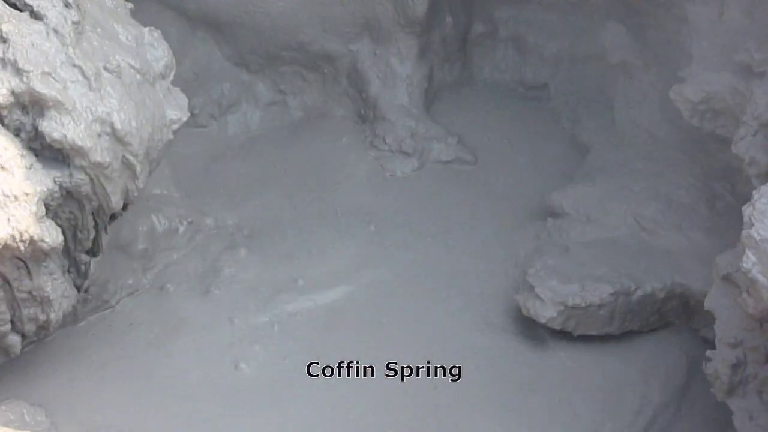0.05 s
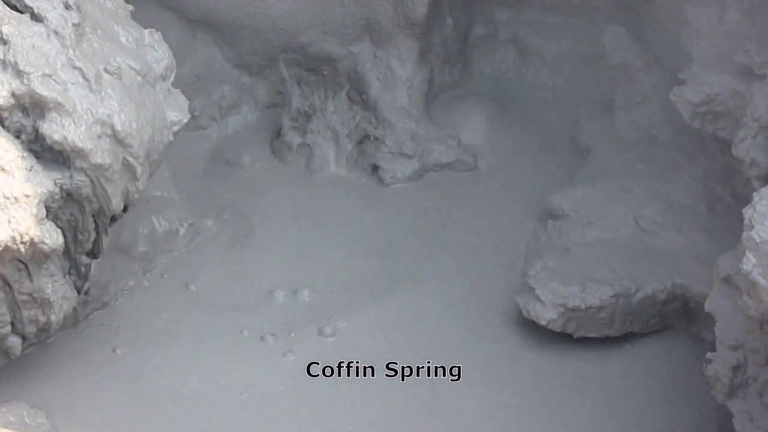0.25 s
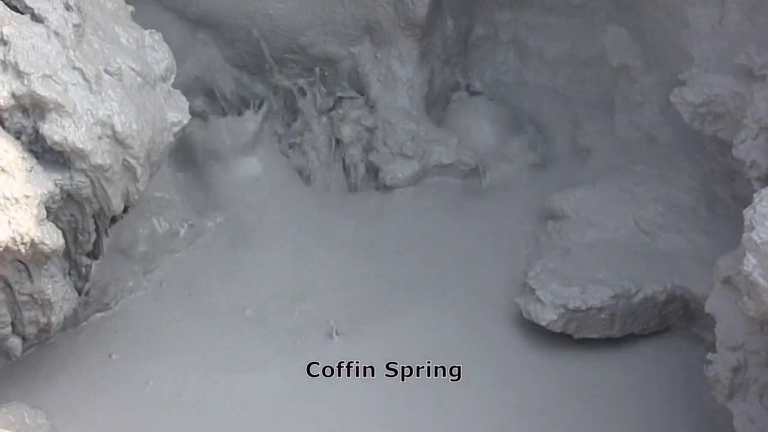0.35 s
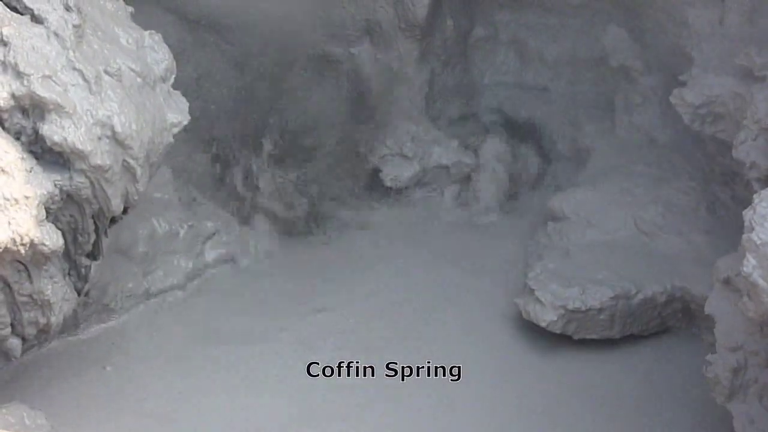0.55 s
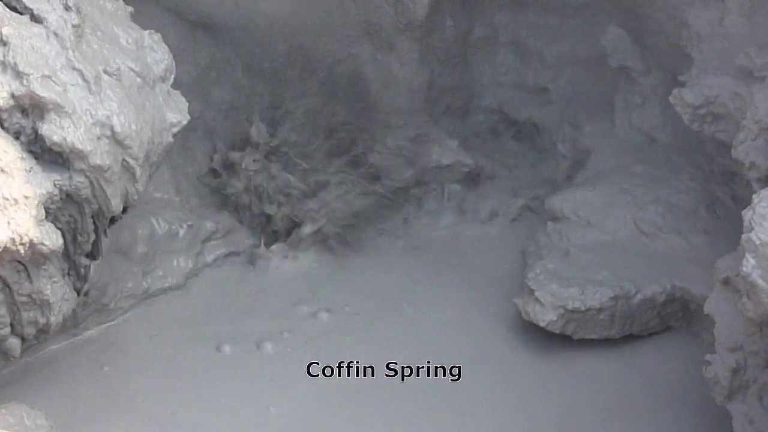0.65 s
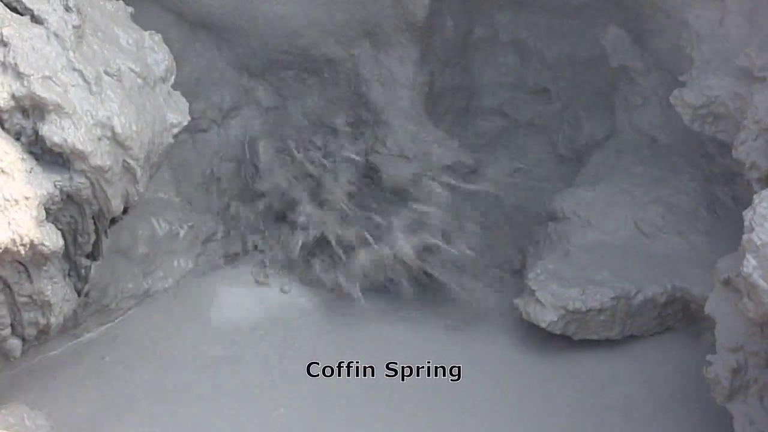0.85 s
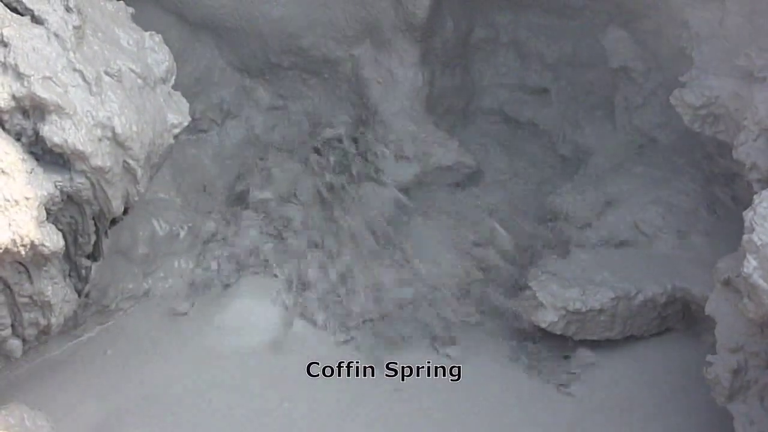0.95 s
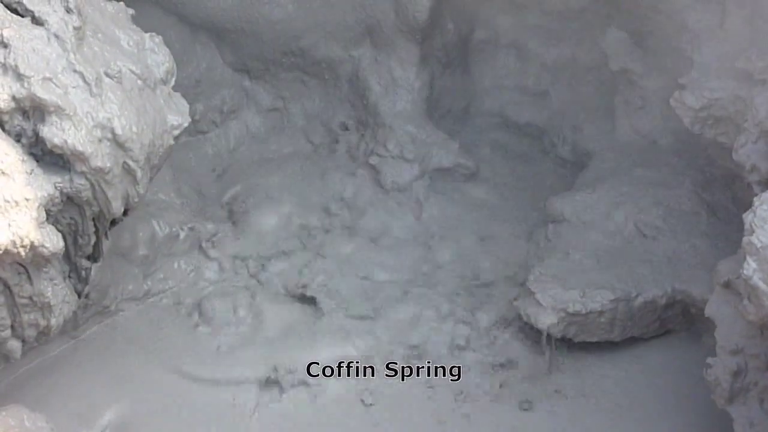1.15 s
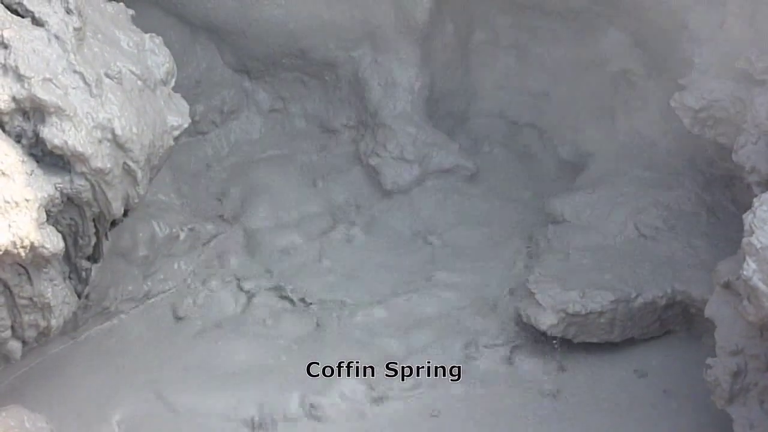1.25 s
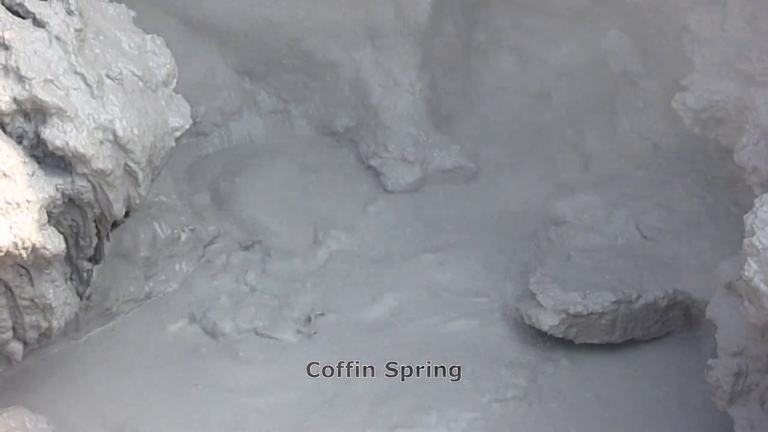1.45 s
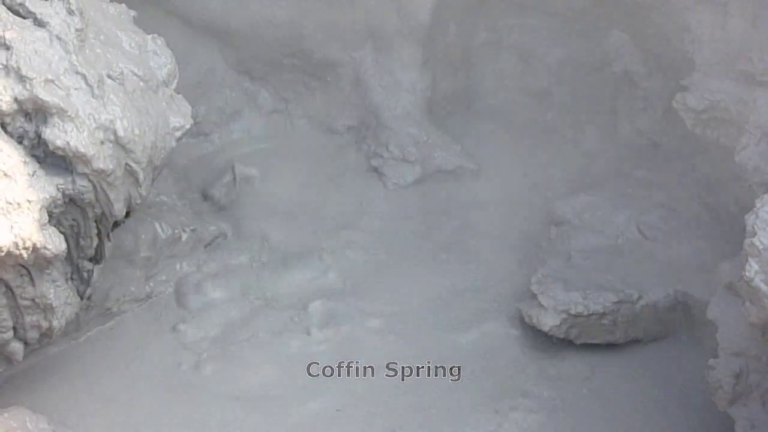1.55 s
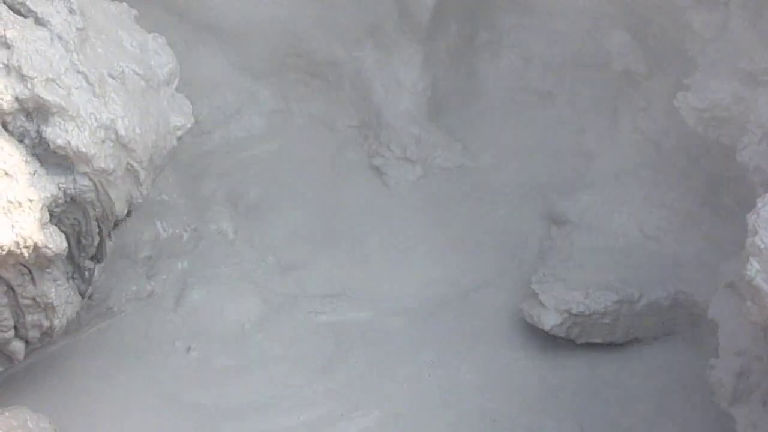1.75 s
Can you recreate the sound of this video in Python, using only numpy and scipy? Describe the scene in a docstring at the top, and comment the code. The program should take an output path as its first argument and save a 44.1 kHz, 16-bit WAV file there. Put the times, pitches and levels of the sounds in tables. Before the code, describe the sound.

A muddy hot spring surges once in a rocky hollow outdoors. Low gulps of gas throw up a splash, spray patters back and the pool sloshes, then settles with single bubble pops over a faint steam hiss.

```python
"""A muddy hot spring surges once in a hollow of rock, outdoors.
It starts on a faint simmer and hiss of steam, which last throughout. From 0.2 s pockets of gas
gulp up and heave the mud; near 0.6 s they throw the water. The spray rains back and the pool
sloshes until about 1.2 s. Single bubbles pop during the surge and on to the end as it settles."""
import sys
import numpy as np
from scipy import signal
from scipy.io import wavfile

SR = 44100
rng = np.random.default_rng(int(sys.argv[2]) if len(sys.argv) > 2 else 0)


def materialize(psi):
    """Save the field psi as 16-bit PCM at rate SR to the path in sys.argv[1].

    A 1-D psi becomes a single channel; in a 2-D psi each row is a channel.
    """
    bounded = np.clip(np.atleast_2d(psi).T, -1, 1)
    quanta = np.round(bounded * 32767).astype(np.int16)
    wavfile.write(sys.argv[1], SR, quanta)


N = 79380
TIME_S = np.arange(N) / SR

# layer envelopes: (time [s], level [dB])
SURGE_LEVEL = [(0, -78), (.22, -59), (.27, -47.5), (.335, -42), (.355, -46), (.385, -38), (.41, -53.5),
               (.46, -43.5), (.515, -27), (.56, -37.5), (.58, -24.5), (.62, -38), (.655, -26.5),
               (.685, -30.5), (.70, -27), (.74, -38.5), (.85, -37), (1.8, -75.5)]
SPRAY_LEVEL = [(0, -61), (.24, -56), (.262, -45), (.30, -59), (.385, -48), (.462, -42.5), (.474, -38),
               (.53, -29.5), (.66, -35.5), (.80, -39.5), (.91, -36.5), (1.06, -30), (1.13, -31.5),
               (1.21, -39), (1.28, -45.5), (1.385, -50.5), (1.44, -40.5), (1.50, -55), (1.8, -57)]
SLOSH_LEVEL = [(0, -75), (.07, -68), (.1, -51.5), (.15, -79.5), (.19, -49.5), (.22, -62), (.32, -46.5),
               (.364, -45.5), (.378, -37.5), (.42, -38.5), (.58, -29.5), (.77, -41), (.88, -40.5),
               (1.0, -43), (1.12, -37.5), (1.21, -51.5), (1.42, -44), (1.52, -59), (1.8, -56)]
HEAVE_LEVEL = [(0, -57), (.07, -63.5), (.15, -55), (.18, -50), (.25, -43), (.29, -48), (.355, -47),
               (.375, -39.5), (.47, -36.5), (.54, -33), (.58, -26.5), (.61, -29), (.66, -33), (.69, -37.5),
               (.76, -44), (.80, -56), (1.15, -56.5), (1.3, -68.5), (1.8, -66.5)]
# layer spectra: (frequency [Hz], relative density [dB])
SURGE_SPECTRUM = [(60, -26.5), (150, -18), (240, 0), (320, -7.5), (420, 0), (540, -5.5), (800, -1.5),
                  (1120, -6), (1350, -3.5), (1700, -7), (3000, -10.5), (4500, -15), (6300, -18),
                  (7400, -26)]
SPRAY_SPECTRUM = [(60, -28), (120, -14.5), (280, -13.5), (500, -8), (900, 1), (1150, -2), (1350, 1.5),
                  (2000, -1), (2800, 3), (4000, -3.5), (5200, -5), (6400, -6.5), (7400, 1)]
SLOSH_SPECTRUM = [(50, -22), (110, -20), (200, -8), (290, -10), (400, 1.5), (560, -1.5), (740, -9),
                  (1000, -14.5), (1600, -21), (7000, -48.5)]
HEAVE_SPECTRUM = [(30, -12), (48, -11.5), (70, 0), (100, 2), (135, -2), (175, -4.5), (240, -14), (400, -22),
                  (1000, -50), (7000, -79)]
SIMMER_SPECTRUM = [(25, -16.5), (50, -9), (90, -9.5), (170, 8), (300, -1), (700, -5.5), (1100, -8.5),
                   (1700, -15), (2700, 1), (4500, -23), (7000, -10)]
STEAM_SPECTRUM = [(30, -7.5), (200, 9), (1000, 8), (3000, -10.5), (5000, -3), (6400, -4), (7400, -22.5)]
# gas pockets: (peak time [s], pitch [Hz], glide [oct/s], peak [dB], swell tau [s], decay tau [s])
GAS_POCKETS = [(0.24, 64.4, 15, -32.5, 0.036, 0.018), (.397, 42.7, -4, -28.5, 0.011, 0.034),
               (.376, 133, -0.5, -29, .004, 0.014), (.398, 258.3, -1.5, -31.5, 0.0092, 0.044),
               (0.537, 98, -5, -21, 0.014, 0.013), (0.571, 85.6, -11.5, -20, .006, 0.02),
               (.644, 229.6, 1, -16.5, 0.013, 0.0081), (0.657, 112.3, -11, -15, .008, 0.0076),
               (0.747, 69.5, 19.5, -34, .03, 0.044), (1.154, 117, -8.5, -36.5, 0.0043, 0.018)]
# bursting bubbles: (time [s], pitch [Hz], ring [dB], ring T60 [s], splat [dB], attack tau [s])
BUBBLE_BURSTS = [(0.032, 6470, -34, 0.0061, -42.5, 0.00024), (0.236, 1030, -26, 0.044, -31, 0.00039),
                 (0.2358, 2550, -34, 0.021, -45, 0.00037), (.254, 5010, -38.5, 0.028, -43, 0.0015),
                 (.314, 575, -31.5, 0.14, -45.5, 0.0021), (0.325, 1535, -30.5, 0.047, -29, 0.0025),
                 (0.33, 2545, -33, 0.033, -33.5, 0.00206), (.469, 5700, -36, .015, -30, 0.00039),
                 (.513, 1080, -38, 0.016, -30.5, 0.0015), (.574, 390, -26, 0.024, -26, 0.0019),
                 (.575, 1086, -20.5, 0.034, -20, 0.0023), (0.602, 1140, -17, 0.028, -29.5, .001),
                 (.695, 753, -34, 0.053, -28, 0.0012), (1.106, 547, -26, 0.036, -31, 0.0011),
                 (1.15, 2050, -17, 0.016, -26, 0.00054), (1.152, 2537, -22, 0.026, -25, 0.00053),
                 (1.285, 437, -26.5, 0.034, -37.5, 0.00054), (1.298, 405, -26.5, 0.032, -46, 0.0012),
                 (1.3306, 2854, -28, 0.036, -32, 0.00072), (1.393, 1387, -32, 0.044, -33, 0.0035),
                 (1.406, 1080, -32, 0.015, -34, 0.0016), (1.439, 2207, -30.5, 0.03, -29.5, 0.0023),
                 (1.57, 2220, -38.5, 0.023, -38, 0.00077), (1.598, 1190, -35.5, 0.017, -48, 0.00085),
                 (1.626, 3000, -45, 0.012, -45.5, .001), (1.682, 2320, -41.5, 0.0098, -43, 0.00061),
                 (1.742, 714, -38, 0.052, -41.5, 0.0016), (1.754, 3150, -35.5, 0.027, -40, 0.0024)]
# rock wall echoes: (delay [s], gain [dB])
WALL_ECHOES = [(.0031, -21), (.0074, -4.5), (.0135, -15)]
# peaks and dips of the hollow: (frequency [Hz], width [Hz], gain [dB])
HOLLOW_RESONANCES = [(349, 8.5, 1.5), (438, 11, 3), (539, 59, -6), (595, 24, 1), (752, 21, 3.5),
                     (1138, 43, 6.5), (1390, 330, -7), (1429, 60, 8)]


def surge():
    """Gas tears the surface open and throws up a sheet of muddy water."""
    sheet = water(SURGE_SPECTRUM, drops_per_s=900, bubbles_per_s=140, spread_db=3.5,
                  t60_cycles=24, bubble_db=4.5, wash_db=-1, flicker_db=2.1)
    return envelope(SURGE_LEVEL) * sheet


def gulps(roughness=0.17):
    """Big gas pockets throb unevenly, swell and glide as they near the surface, then die away."""
    out = np.zeros(N)
    for peak_s, hz, glide_oct_per_s, peak_db, swell_s, decay_s in GAS_POCKETS:
        t = TIME_S - peak_s
        pitch_hz = hz * 2 ** np.clip(glide_oct_per_s * t, -.75, .75)
        cycles = np.cumsum(pitch_hz) / SR
        cycles -= np.interp(peak_s, TIME_S, cycles)  # zero phase at the peak
        swell = np.exp(-np.abs(t) / np.where(t < 0, swell_s, decay_s))
        throb = 1 + roughness * drift(hz / 2)
        out -= from_db(peak_db) * swell * throb * np.cos(2 * np.pi * cycles)
    return out


def pops(rise_oct_per_s=1.8, wobble_rad=0.71, splat_t60_s=0.029, splat_width_oct=0.96):
    """Each bubble bursts with a wet splat and a short, rising ring that wobbles in the mud."""
    out = np.zeros(N)
    edge_ratio = 2 ** (splat_width_oct / 2)
    for start_s, hz, ring_db, ring_t60_s, splat_db, attack_s in BUBBLE_BURSTS:
        t = np.maximum(TIME_S - start_s, 0)
        pitch_hz = hz * 2 ** np.minimum(rise_oct_per_s * t, 1)
        cycles = np.cumsum(pitch_hz * (t > 0)) / SR
        phase_rad = 2 * np.pi * cycles + wobble_rad * drift(hz / 10)
        tone = from_db(ring_db - 60 * t / ring_t60_s) * np.sin(phase_rad)
        noise = unit_rms(band(rng.standard_normal(N), hz / edge_ratio, hz * edge_ratio))
        splat = from_db(splat_db - 60 * t / splat_t60_s) * noise
        out += (tone + splat) * (1 - np.exp(-t / attack_s))
    return out


def spray():
    """Drops patter on the pool and the rock."""
    patter = water(SPRAY_SPECTRUM, drops_per_s=1300, bubbles_per_s=180, spread_db=2.5,
                   t60_cycles=27, bubble_db=0, wash_db=-2, flicker_db=1.3)
    return envelope(SPRAY_LEVEL) * patter


def slosh():
    """The stirred pool gurgles with mid-sized bubbles."""
    gurgle = water(SLOSH_SPECTRUM, drops_per_s=300, bubbles_per_s=40, spread_db=3.5,
                   t60_cycles=22.2, bubble_db=0.5, wash_db=-8.5, flicker_db=3.5)
    return envelope(SLOSH_LEVEL) * gurgle


def heave():
    """Thick mud rumbles as gas pushes through it."""
    rumble = coloured(lambda hz: clicks(per_s=400, spread_db=3.1), HEAVE_SPECTRUM, flicker_db=-0.5)
    return envelope(HEAVE_LEVEL) * rumble


def simmer(level_db=-60):
    """Sparse drops and bubbles keep the pool simmering."""
    return from_db(level_db) * water(SIMMER_SPECTRUM, drops_per_s=130, bubbles_per_s=29, spread_db=7,
                                     t60_cycles=20, bubble_db=5, wash_db=0, flicker_db=1.0)


def steam(level_db=-56.5):
    """Steam hisses: noise in flickering bands."""
    return from_db(level_db) * coloured(lambda hz: rng.standard_normal(N), STEAM_SPECTRUM, flicker_db=4)


def water(spectrum, drops_per_s, bubbles_per_s, spread_db, t60_cycles, bubble_db, wash_db, flicker_db):
    """Broadband drop ticks, ringing bubbles and a wash of fine spray; RMS 1."""
    ticks = clicks(drops_per_s, spread_db)

    def source(hz):
        pitches_hz = [hz * 2 ** (step / 9) for step in (-1, 0, 1)]  # bubbles_per_s at each pitch
        rings = sum(ring(clicks(bubbles_per_s, spread_db), f, t60_cycles) for f in pitches_hz)
        bubbles = from_db(bubble_db) * unit_rms(rings) * np.sqrt(hz / SR)
        wash = from_db(wash_db) * rng.standard_normal(N)
        return ticks + wash + bubbles
    return coloured(source, spectrum, flicker_db)


def ring(x, hz, t60_cycles):
    """A small bubble rings as a damped resonator."""
    radius = from_db(-60 * hz / (t60_cycles * SR))
    angle_rad = 2 * np.pi * hz / SR
    return signal.lfilter([1, 0, -1], [1, -2 * radius * np.cos(angle_rad), radius * radius], x + 1e-18)


def clicks(per_s, spread_db):
    """Random impacts, many small and a few large; RMS 1."""
    slots = N // 4  # at most one impact per 4 samples
    chance, size, sign = rng.random((3, slots))
    hits = np.flatnonzero(chance < 4 * per_s / SR)
    onsets = 4 * hits + rng.integers(0, 4, slots)[hits]
    size_db = spread_db * np.minimum(-np.log(size[hits]), 3.5)
    out = np.zeros(N)
    out[onsets] = from_db(size_db) * np.sign(sign[hits] - .5)
    return unit_rms(out)


def coloured(source, spectrum, flicker_db):
    """Third-octave bands of source(hz), each with its own level and flicker; RMS 1."""
    edges_hz = 28 * 2 ** (np.arange(26) / 3)
    points_hz, points_db = np.transpose(spectrum)
    out = np.zeros(N)
    for low_hz, high_hz in zip(edges_hz, edges_hz[1:]):
        hz = np.sqrt(low_hz * high_hz)
        density_db = np.interp(np.log(hz), np.log(points_hz), points_db)
        flickering = band(source(hz), low_hz, high_hz) * from_db(flicker_db * drift(36))
        out += unit_rms(flickering) * from_db(density_db) * np.sqrt(high_hz - low_hz)
    return unit_rms(out)


def hollow_resonance(x):
    """The hollow favours some pitches and swallows others."""
    for hz, width_hz, db in HOLLOW_RESONANCES:
        x = x + (from_db(db) - 1) * signal.lfilter(*signal.iirpeak(hz, hz / width_hz, fs=SR), x)
    return x


def wall_echoes(x):
    """Rock walls add distinct echoes to a sound from one spot."""
    return x + sum(from_db(db) * np.interp(TIME_S - delay_s, TIME_S, x, left=0)
                   for delay_s, db in WALL_ECHOES)


def hollow_tail(x, t60_s=0.17, tail_db=-16):
    """Close rock scatters sound into a short tail."""
    t = TIME_S[:SR // 3]
    build_up = np.minimum(t / WALL_ECHOES[-1][0], 1)
    scatter = rng.standard_normal(len(t)) * from_db(-60 * t / t60_s) * build_up
    tail = signal.fftconvolve(x, scatter / np.linalg.norm(scatter))[:N]
    return x + from_db(tail_db) * tail


def drift(corner_hz):
    """Slow random wander; RMS about 1."""
    hop, warm_up = 40, 2000
    pole = np.exp(-2 * np.pi * corner_hz * hop / SR)
    noise = rng.standard_normal(N // hop + warm_up + 2)
    slow = signal.lfilter([1], [1, -2 * pole, pole * pole], noise)[warm_up:]
    return np.interp(np.arange(N) / hop, np.arange(len(slow)), unit_rms(slow))


def band(x, low_hz, high_hz):
    """Butterworth band-pass."""
    sos = signal.butter(2, [low_hz, min(high_hz, .45 * SR)], "band", fs=SR, output="sos")
    return signal.sosfilt(sos, x + 1e-18)


def envelope(levels):
    """Level table to gain per sample."""
    return from_db(np.interp(TIME_S, *np.transpose(levels)))


def from_db(db):
    """Decibels to gain."""
    return 10 ** (np.asarray(db) / 20)


def unit_rms(x):
    """Scale to RMS 1."""
    return x / np.sqrt(np.mean(x ** 2) + 1e-20)


def scene():
    """One pool, the same in both channels."""
    pool = hollow_resonance(surge() + spray() + slosh() + simmer() + steam())
    mono = hollow_tail(pool + wall_echoes(pops())) + heave() + gulps()
    return np.array([mono, mono])


def record(dry):
    """Narrow treble notch, then a steep low-pass."""
    notch_hz, width_hz, stopband_hz = 5440, 340, 7800
    notched = signal.lfilter(*signal.iirnotch(notch_hz, notch_hz / width_hz, fs=SR), dry)
    return signal.sosfilt(signal.cheby2(16, 70, stopband_hz, fs=SR, output="sos"), notched)


dry = scene()
out = record(dry)
materialize(out)
```